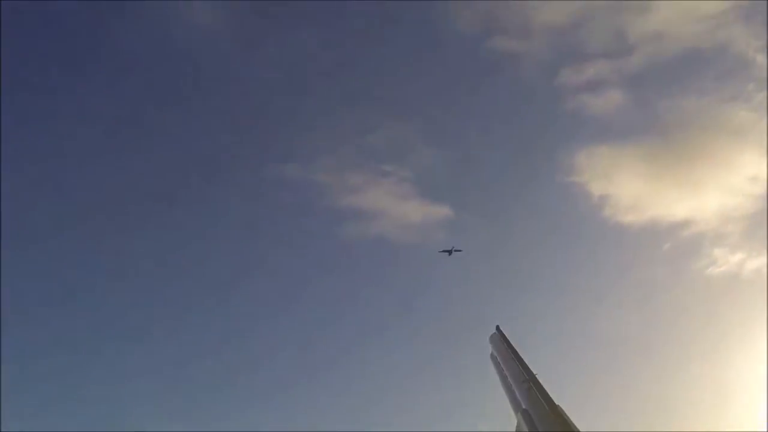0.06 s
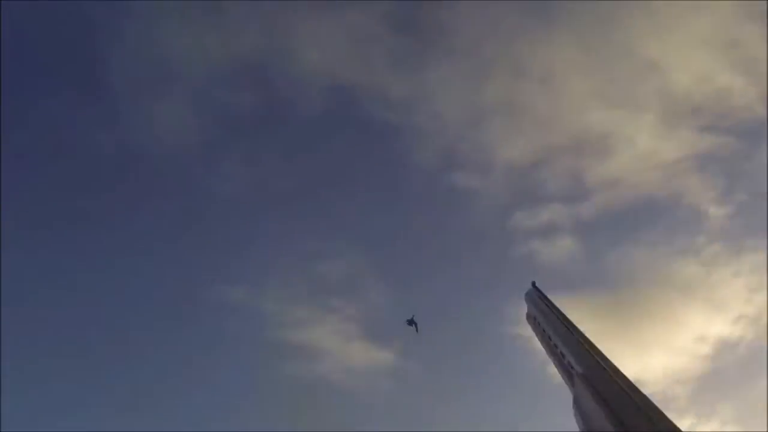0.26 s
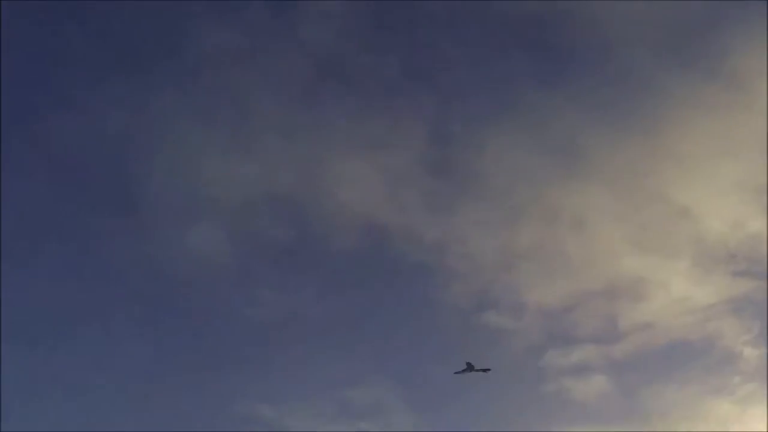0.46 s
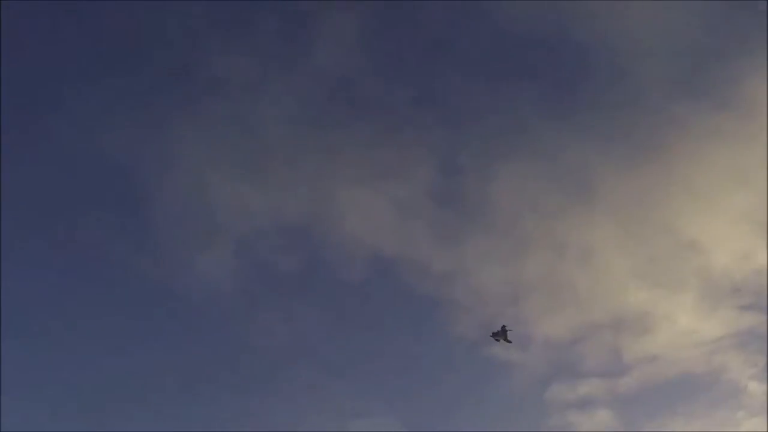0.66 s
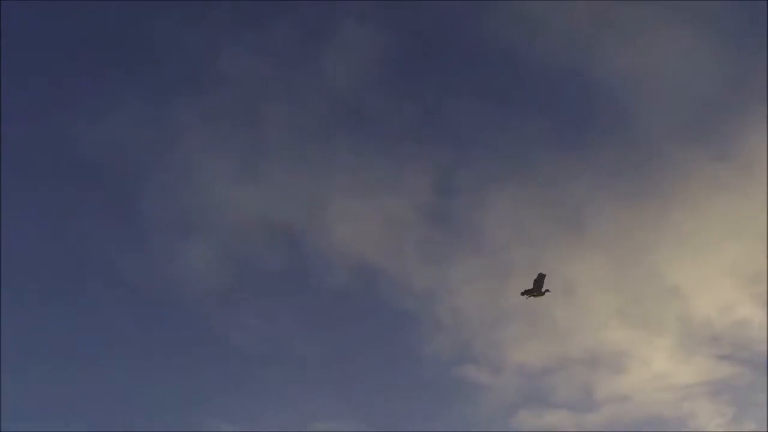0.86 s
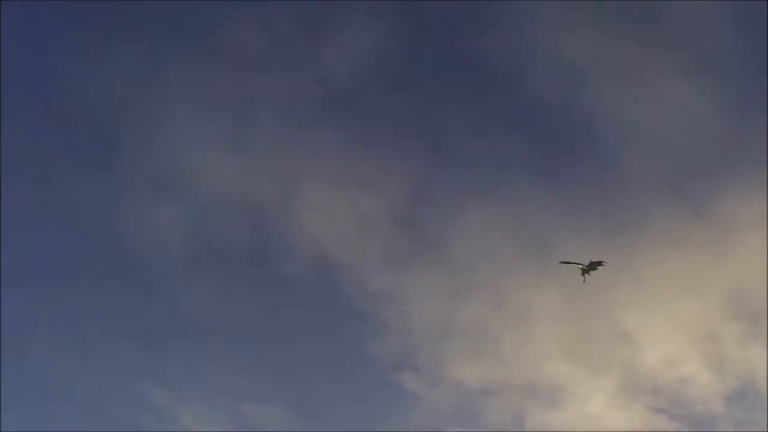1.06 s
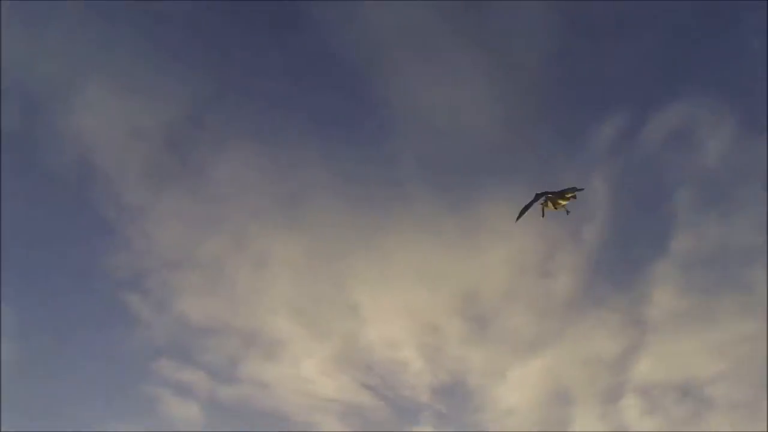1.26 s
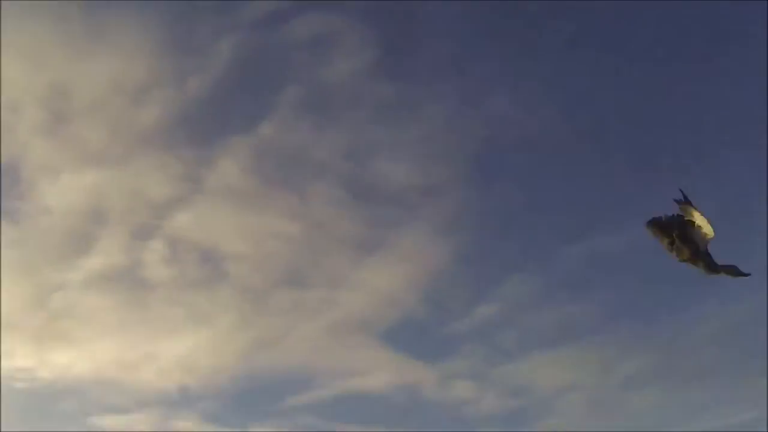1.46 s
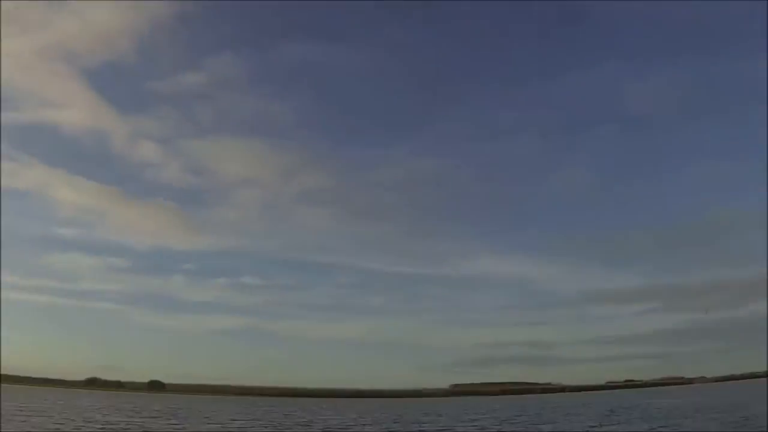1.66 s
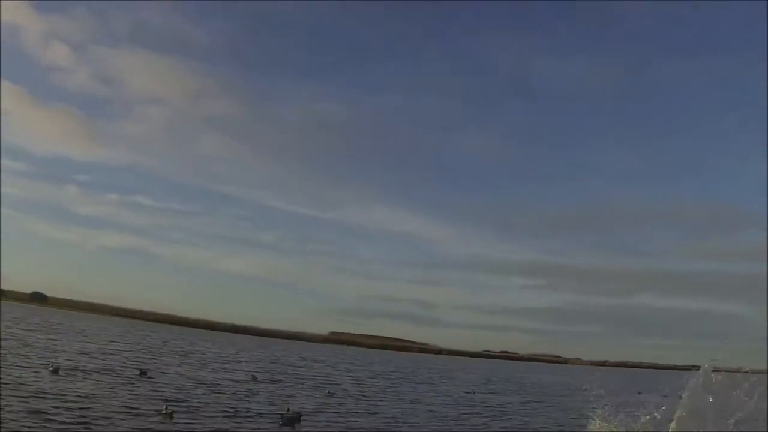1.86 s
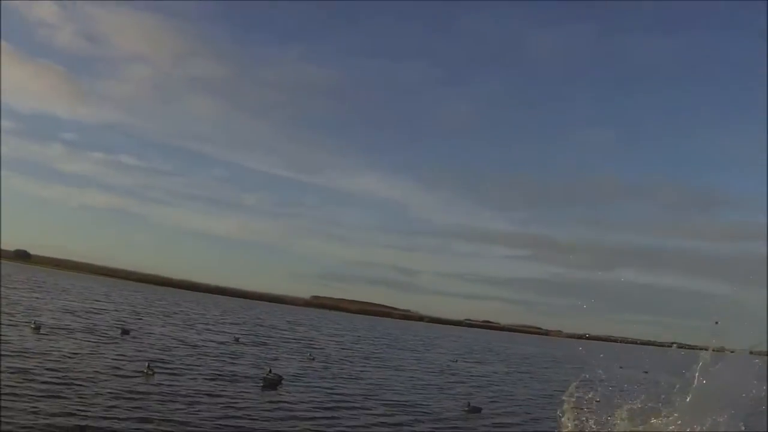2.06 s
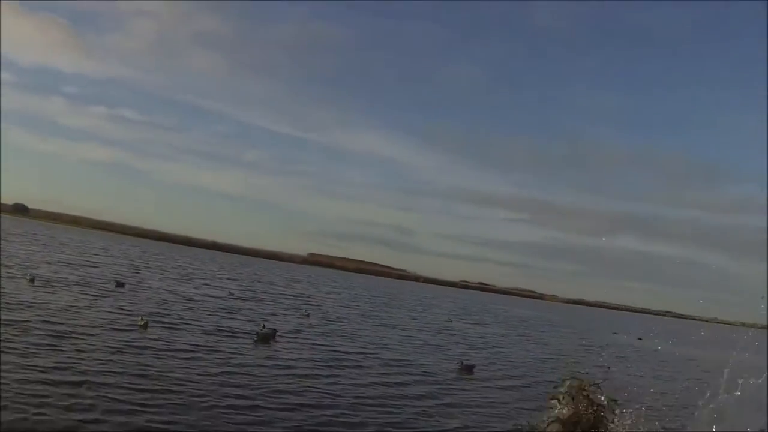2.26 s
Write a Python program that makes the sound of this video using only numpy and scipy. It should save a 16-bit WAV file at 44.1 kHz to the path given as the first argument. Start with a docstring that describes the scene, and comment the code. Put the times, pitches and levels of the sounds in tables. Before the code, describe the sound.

A close shotgun blast echoes over a lake, followed by a faint splash in light wind.

```python
"""One shotgun shot over a lake, at arm's length from a camera the shooter wears in a plastic housing.
The blast rings the housing and overloads the microphone; the recoil jolts it and the far shore answers.
Close in, clothes rustle and a light wind buffets the microphone. Out on the lake the bird smacks
into the water and the spray falls back."""
import sys
import numpy as np
from scipy import signal
from scipy.fft import rfft, irfft, next_fast_len
from scipy.io import wavfile
from scipy.ndimage import minimum_filter1d, map_coordinates

SR = 44100
rng = np.random.default_rng(int(sys.argv[2]) if len(sys.argv) > 2 else 0)


def master_out(mix):
    """Clip the mix to full scale and print it as 16-bit PCM to the path in sys.argv[1]."""
    frames = np.transpose(np.atleast_2d(mix))
    ceiling = np.clip(frames, -1, 1)
    pcm = np.round(ceiling * 32767).astype(np.int16)
    wavfile.write(sys.argv[1], SR, pcm)


N = 105840
SHOT_S = .24949


def amp(db):
    """Decibels to gain."""
    return 10 ** (np.asarray(db) / 20)


def unit(x):
    """Scaled to rms 1."""
    return x / np.sqrt(np.mean(x ** 2) + 1e-20)


def clock():
    """Seconds at each sample."""
    return np.arange(N) / SR


def curve(rows):
    """Gain at each sample from (time_s, level_db) points."""
    return amp(np.interp(clock(), *np.transpose(rows)))


def gain_at(spectrum, hz):
    """Gain at hz from (freq_hz, level_db) points on a log axis."""
    freq_hz, level_db = np.transpose(spectrum)
    return amp(np.interp(np.log(hz + 1), np.log(freq_hz + 1), level_db))


def filtered(x, response):
    """x filtered by a gain that depends on frequency."""
    size = next_fast_len(N + SR // 2)
    return irfft(rfft(x, size) * response(np.fft.rfftfreq(size, 1 / SR)), size)[:N]


def coloured(x, spectrum):
    """x shaped by a spectrum, at rms 1."""
    return unit(filtered(x, lambda hz: gain_at(spectrum, hz)))


def noise(spectrum):
    """Fresh coloured noise at rms 1."""
    return coloured(rng.standard_normal(N), spectrum)


def wobble(rate):
    """A smooth random curve, rate knots a second."""
    return map_coordinates(rng.standard_normal(int(N * rate / SR) + 4), [clock() * rate])


def swell(start_s, rise_s, t60_s):
    """A straight rise, then an exponential decay."""
    t = clock() - start_s
    return np.clip(t / rise_s, 0, 1) * amp(-60 * np.maximum(t - rise_s, 0) / t60_s)


def swells(rows):
    """The joint envelope of (start_s, rise_s, t60_s, level_db) rows."""
    return sum(amp(db) * swell(start, rise, t60) for start, rise, t60, db in rows)


def ring(start_s, hz, rise_s, t60_s):
    """One damped resonance."""
    return swell(start_s, rise_s, t60_s) * np.sin(2 * np.pi * hz * (clock() - start_s))


def whine(flutter_hz=38):
    """A thin, high band of noise flutters under everything."""
    # narrow treble band: freq_hz, level_db
    band = [(5100, -60.5), (5450, -7), (5620, 1), (5780, -8), (6100, -59)]
    flutter = np.sin(np.pi * flutter_hz * clock()) ** 2
    return amp(-86) * unit(noise(band) * flutter)


def wind():
    """Light buffeting on the microphone over a soft hiss of air and ripples."""
    # gusts: time_s, level_db
    gusts = [(0, -36.5), (.15, -36.5), (.25, -44.5), (.38, -31.5), (.5, -29), (.68, -36.5), (.87, -38.5),
             (1.05, -45), (1.22, -32), (1.42, -44.5), (1.8, -39.5), (2, -43.5), (2.4, -45.5)]
    # spectra of the buffeting and the open air: freq_hz, level_db
    rumble = [(8, -21), (14, 1), (28, 0), (46, -11.5), (65, -26), (92, -32.5), (140, -42.5), (220, -55.5),
              (440, -90)]
    air = [(76, -20), (130, -4.5), (252, -7), (497, -13), (726, -13.5), (1040, -16), (1450, -10.5),
           (1750, -16), (3400, -21.5), (3900, -28), (5400, -26), (6200, -31.5), (8850, -32), (14000, -27.5),
           (15500, -31.5)]
    return curve(gusts) * noise(rumble) + amp(-67.5 + .39 * wobble(4)) * noise(air)


def squeak(start_s=1.288, pitch_hz=1480, glide_hz_per_s=4000):
    """One faint, short, rising squeak."""
    hz = pitch_hz + glide_hz_per_s * np.clip(clock() - start_s, 0, .05) + 45 * wobble(400)
    tone = np.sin(2 * np.pi * np.cumsum(hz) / SR)
    return amp(-49.5) * swell(start_s, rise_s=.018, t60_s=.08) * tone


def shooter():
    """Grainy brushes of clothing by the microphone, and dull bumps as the shooter turns."""
    # rubbing cloth: freq_hz, level_db
    cloth = [(150, 2), (500, -7.5), (1000, -7.5), (1550, 2.5), (2100, -7), (2800, -9.5), (4000, -21.5),
             (7000, -31), (15000, -41)]
    # brushes: start_s, rise_s, t60_s, level_db
    rustles = [(.385, 0.013, 0.41, -40.5), (.445, .01, 0.236, -51.5), (1.11, 0.031, 0.29, -61),
               (1.215, 0.022, 0.067, -53), (1.29, 0.02, 0.34, -54.5), (1.40, .015, 0.14, -63.5)]
    # bumps: start_s, pitch_hz, level_db
    bumps = [(1.231, 409, -42.5), (2.072, 508, -57)]
    grain = unit(noise(cloth) * amp(2.4 * wobble(250)))
    thuds = sum(amp(db) * ring(start, hz, rise_s=.0045, t60_s=.031) for start, hz, db in bumps)
    return grain * swells(rustles) + thuds


def spray(drops_per_s=1100, drop_share=.45):
    """Thrown water patters back on the lake as many short drops over a wash."""
    # drops on water: freq_hz, level_db
    water = [(120, -30), (300, -16.5), (650, -15), (1050, -17), (1350, 3.5), (1600, -3.5), (1850, -2.5),
             (2300, -8.5), (2700, -14), (4800, -21), (5300, -17), (5900, -26.5), (6500, -19.5), (7600, -33),
             (15000, -35)]
    # the fall of the spray: time_s, level_db
    fall = [(2.06, -84.5), (2.12, -61), (2.18, -63), (2.23, -54.5), (2.28, -59.5), (2.33, -57), (2.4, -61)]
    hits = (rng.random(N) < drops_per_s / SR) * rng.standard_normal(N)
    drop = rng.standard_normal(N) * swell(0, rise_s=.00064, t60_s=.016)
    patter = coloured(signal.fftconvolve(hits, drop)[:N], water)
    return curve(fall) * (np.sqrt(drop_share) * patter + np.sqrt(1 - drop_share) * noise(water))


def splash():
    """Out on the lake the bird smacks the water, which bursts up with a fizz."""
    # impacts: start_s, rise_s, t60_s, level_db
    impacts = [(1.7482, 0.00092, 0.022, -40.5), (1.7525, 0.00049, 0.038, -37.5),
               (1.7595, 0.00083, 0.025, -44), (1.765, 0.015, 0.26, -61.5)]
    # spectra of the impact and the bursting water: freq_hz, level_db
    smack = [(150, -11), (700, -8.5), (950, -14), (1350, 7), (1600, -7), (2000, -4.5), (2900, -26),
             (4400, -19), (5500, -27), (6400, -23), (8000, -33), (15000, -48)]
    fizz = [(1000, -25), (3000, 0), (4500, 2), (6500, -3), (8000, -18), (15000, -25)]
    burst = amp(-52.5) * swell(1.7595, rise_s=.00055, t60_s=.058)
    return swells(impacts) * noise(smack) + burst * noise(fizz)


def lake_echoes():
    """Bank and reeds scatter the blast, it rolls away over the water, and the far shore sends it back."""
    # spectra of the returning blast: freq_hz, level_db
    off_bank = [(100, -10), (600, -10), (1030, -12), (1350, 1.5), (2100, -10), (2500, -17.5), (3500, -14),
                (4700, -21), (8000, -24), (15000, -32)]
    off_reeds = [(100, 3), (500, 0), (1000, -5), (1500, 2), (2500, -6), (5000, -11), (8000, -16),
                 (15000, -30)]
    over_water = [(100, 1), (300, -1), (600, -4.5), (1000, -9), (1400, 0), (2000, -9), (3200, -16.5),
                  (5000, -28), (15000, -45.5)]
    off_shore = [(100, -13), (500, -6), (1000, -6.5), (1350, 4), (1900, -5), (2600, -17.5), (5000, -25.5),
                 (8000, -33), (15000, -49.5)]
    # far shore echoes: start_s, rise_s, t60_s, level_db
    echoes = [(.735, .006, 0.23, -52), (.775, .02, .7, -54.5)]
    bank = amp(-16.5) * swell(SHOT_S, rise_s=.0059, t60_s=.075) * noise(off_bank)
    reeds = amp(-32) * swell(SHOT_S, rise_s=.011, t60_s=.23) * noise(off_reeds)
    roll = amp(-49.5) * swell(SHOT_S, rise_s=.04, t60_s=1.58) * noise(over_water)
    shore = swells(echoes) * noise(off_shore)
    flicker = amp(1.5 * wobble(40))
    return bank + reeds + (roll + shore) * flicker


def recoil():
    """Each jolt of the camera is a low push or pull with a shallow rebound; the gun's fittings click."""
    # jolts: centre_s, half_width_s, level_db, signed_gain (+ push, - pull)
    jolts = [(.3045, 0.0083, -5.5, 0.88), (.314, .007, -18.5, -1.09), (.3295, .0045, -8, -0.89),
             (0.3368, 0.0054, 0.5, 1), (.359, .008, -14, 1), (.454, 0.012, -14.5, 0.95)]
    # clicks of the gun: start_s, t60_s, level_db
    clicks = [(0.3352, 0.015, -31), (0.348, 0.039, -35), (0.3953, .02, -38)]
    # their spectrum: freq_hz, level_db
    fittings = [(200, -1), (1500, 5.5), (3500, -6.5), (7000, -19.5), (14000, -29)]
    pushes = 0
    for centre_s, half_width_s, db, signed_gain in jolts:
        offset = (clock() - centre_s) / half_width_s
        pushes += signed_gain * amp(db) * (1 - offset ** 2) / (1 + offset ** 2) ** 2
    rattle = sum(amp(db) * swell(start, rise_s=.0021, t60_s=t60) for start, t60, db in clicks)
    return pushes + rattle * noise(fittings)


def shot(rise_s=.00086, housing_gain_db=12):
    """At arm's length the muzzle blast cracks and rings the camera's housing."""
    # modes of the plastic housing: pitch_hz, relative_db, t60_s
    modes = [(700, -1.8, .0057), (1322, -.8, .0154), (1698, -19, .0093), (2147, -6.3, .0075),
             (2910, -6.2, .0144), (3440, -7.5, .0044), (5416, -19.4, .015), (7693, -21.2, .01)]
    # muzzle blast: freq_hz, level_db
    blast = [(100, -2), (700, -6), (1400, -2), (3500, -1), (8000, -7), (15000, -17.5)]
    housing = sum(amp(db) * ring(SHOT_S, hz, rise_s, t60) for hz, db, t60 in modes)
    crack = amp(-14) * swell(SHOT_S, rise_s, t60_s=.024) * noise(blast)
    return crack - amp(housing_gain_db) * housing


def scene():
    """Everything that reaches the microphone, in mono."""
    gun = shot() + lake_echoes() + recoil()
    return (gun + shooter() + squeak() + splash() + spray() + wind() + whine())[None]


def gain_control(x, threshold_db=-12, max_duck_db=14, attack_s=.0015, hold_s=.25, release_s=.35):
    """The camera ducks quickly after loud sound, holds, and recovers slowly."""
    over_db = np.clip(20 * np.log10(np.abs(x) + 1e-9) - threshold_db, 0, max_duck_db)
    half_hold = int(hold_s * SR / 2)
    held_db = -minimum_filter1d(-over_db, 2 * half_hold + 1, origin=half_hold, mode="constant")
    fade = np.exp(-clock() / release_s)
    released_db = np.maximum.accumulate(held_db / fade) * fade
    pole = np.exp(-1 / (attack_s * SR))
    duck_db = signal.lfilter([1 - pole], [1, -pole], released_db)
    return x * amp(-duck_db)


def record(dry, clip_level=.5, hardness=6, top_hz=15800):
    """The camera clips what gets past its gain control and rolls off the treble."""
    # treble roll-off: freq_hz, gain_db
    treble = [(4000, 0), (8000, -1), (11000, -4), (14000, -6.5), (15500, -13.5)]
    ducked = gain_control(dry[0])
    clipped = ducked / (1 + np.abs(ducked / clip_level) ** hardness) ** (1 / hardness)
    dulled = filtered(clipped, lambda hz: gain_at(treble, hz))
    return filtered(dulled, lambda hz: np.clip((top_hz - hz) / 1000 + .5, 0, 1))[None]


dry = scene()
out = record(dry)
master_out(out)
```